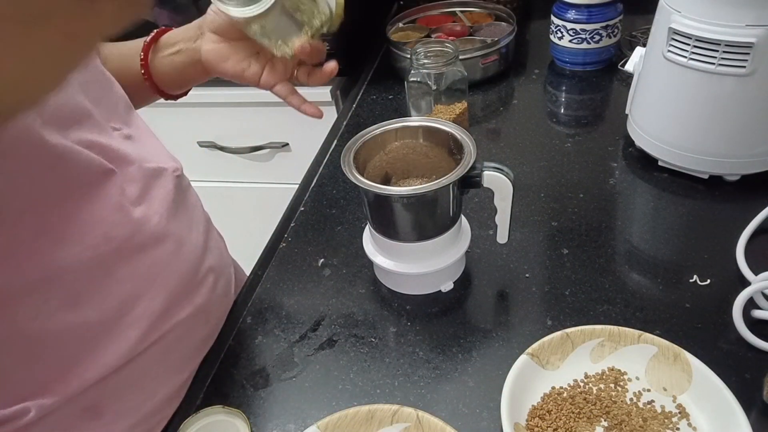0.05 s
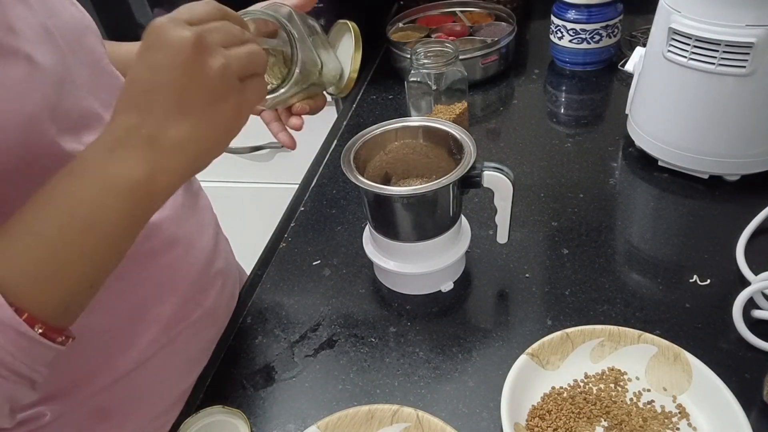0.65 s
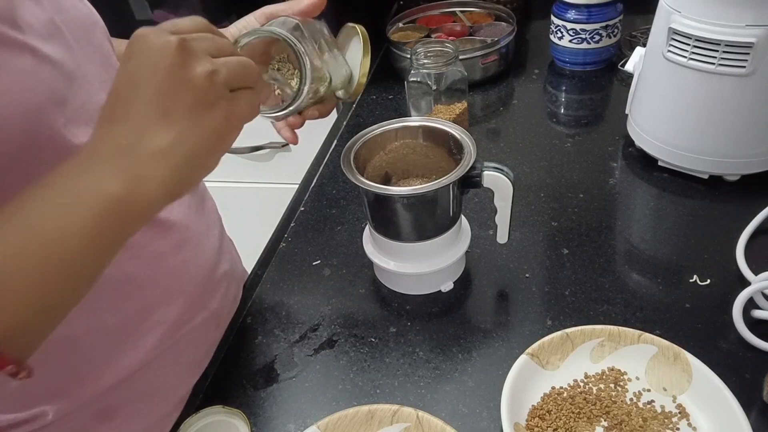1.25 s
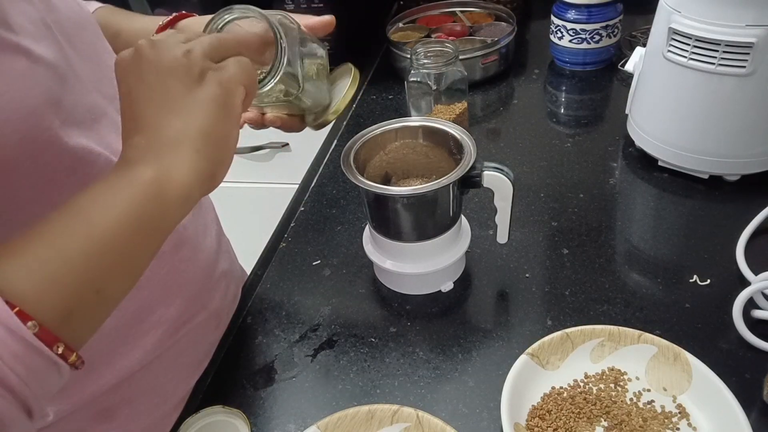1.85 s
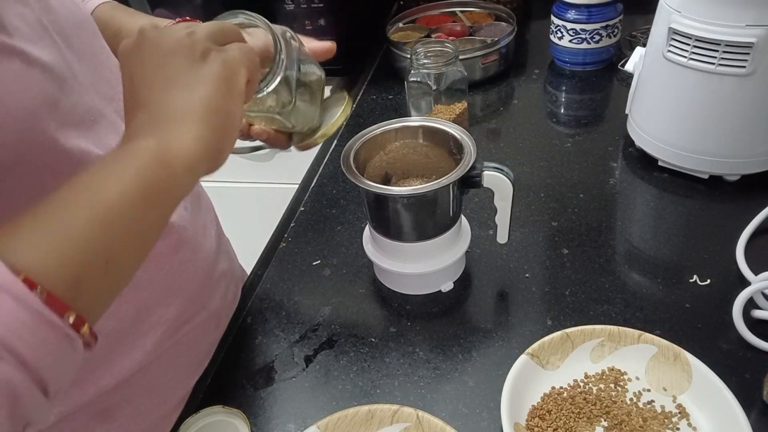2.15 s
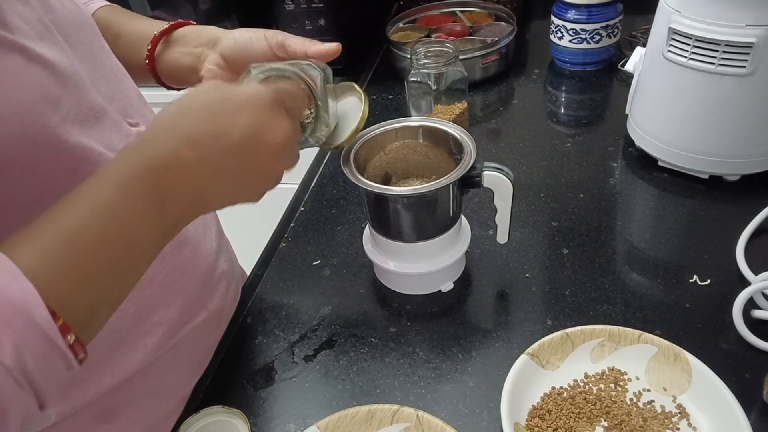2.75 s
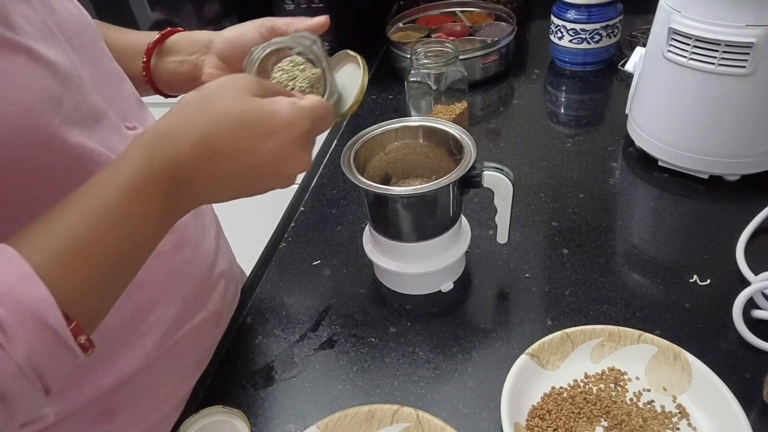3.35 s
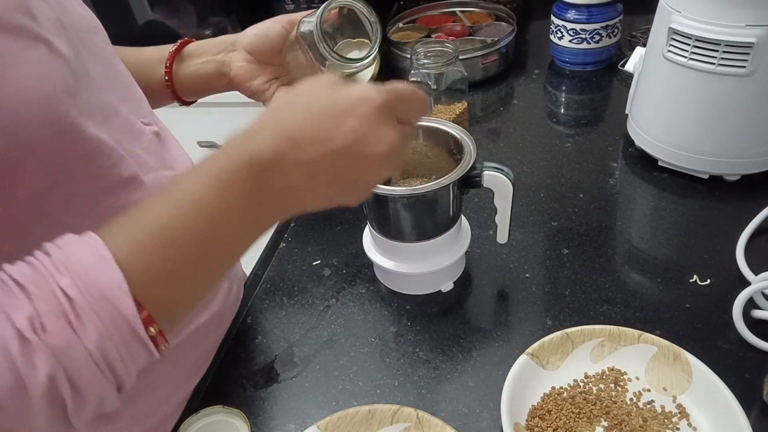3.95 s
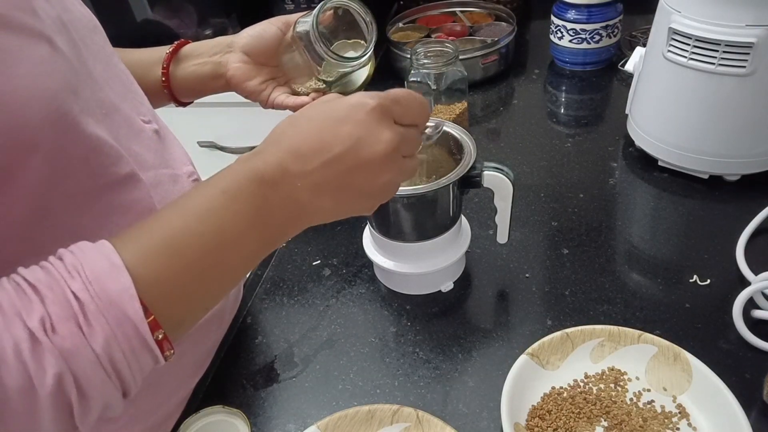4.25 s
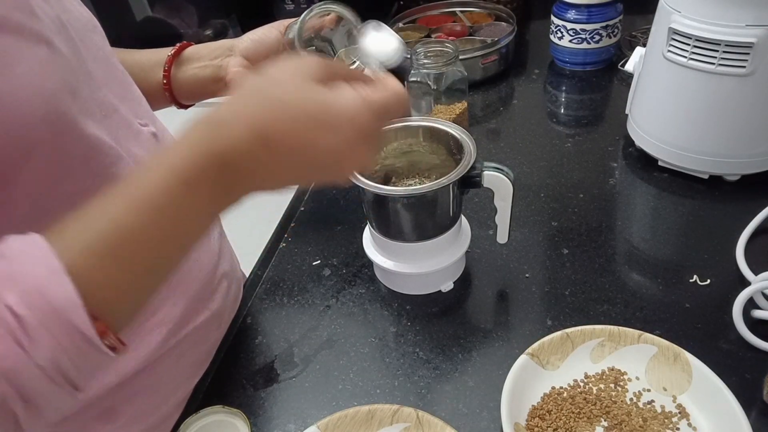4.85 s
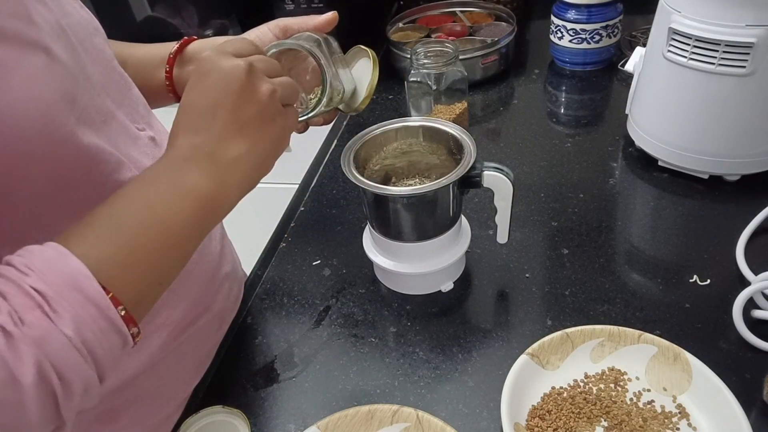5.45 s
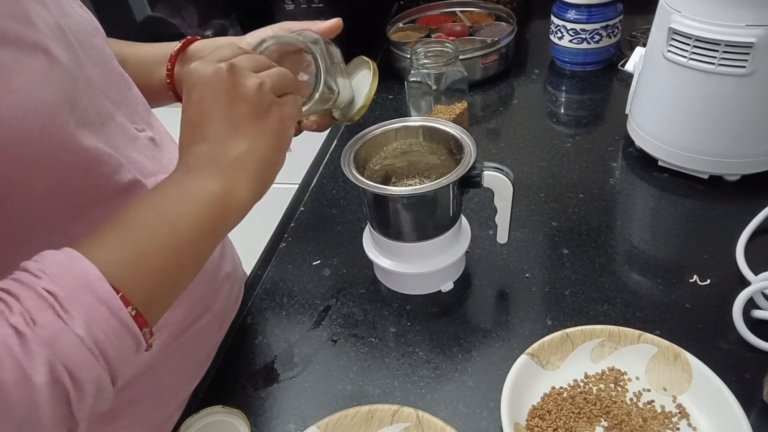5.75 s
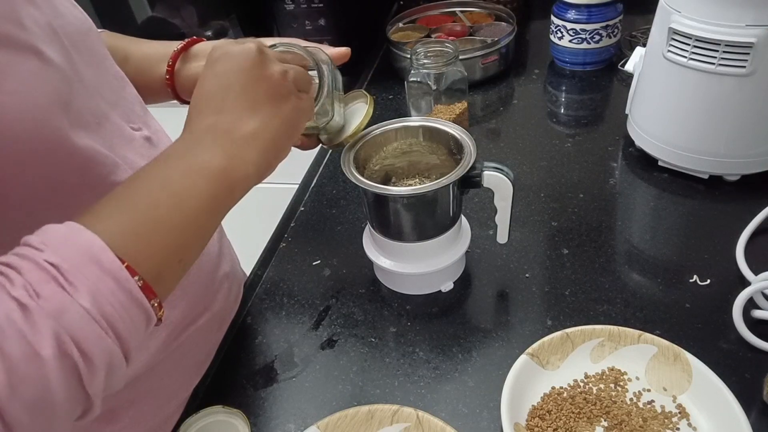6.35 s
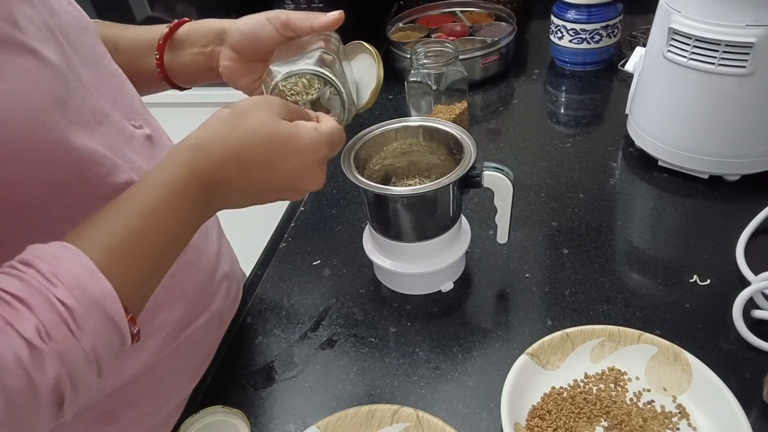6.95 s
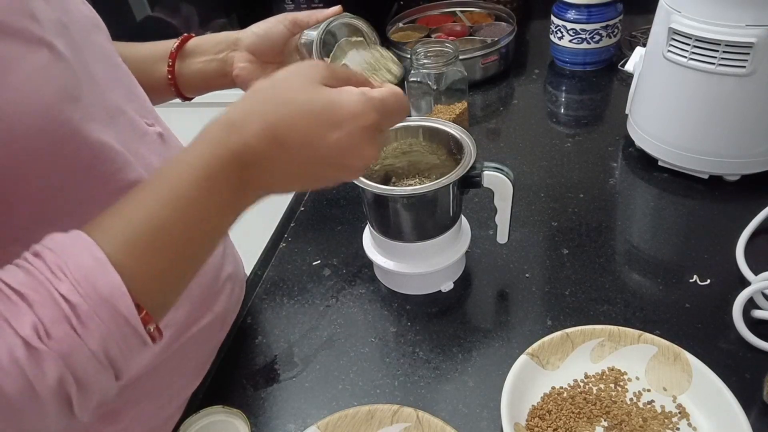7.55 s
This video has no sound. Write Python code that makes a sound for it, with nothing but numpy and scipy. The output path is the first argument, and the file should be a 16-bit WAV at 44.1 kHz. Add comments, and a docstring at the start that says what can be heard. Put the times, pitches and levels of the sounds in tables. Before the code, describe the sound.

In a quiet kitchen with a faint low hum, a nearby metal spoon digs seeds out of a glass jar, making sharp, briefly ringing clinks and gritty little scrapes. The seeds trickle softly into a steel cup with a few light taps. The spoon goes back to the jar, clinking and scraping again, and ends with a couple of small knocks.

```python
"""A steel spoon clinks on a hand-held glass jar and scrapes through the seeds inside, in a tiled kitchen.
Each strike excites the jar's damped resonances; wall, neck and spoon ring on. Scrapes are runs of slips.
Between the two scoops the seeds patter into a steel cup as the spoon taps it.
Small knocks and plinks, some of them thuds of the jar under the spoon, and faint squeaks
sound over a low hum and the rush of air."""
import sys
import numpy as np
from scipy import signal
from scipy.fft import rfft, irfft, next_fast_len
from scipy.io import wavfile
from scipy.ndimage import map_coordinates

SR = 44100
rng = np.random.default_rng(int(sys.argv[2]) if len(sys.argv) > 2 else 0)


def inscribe(sig):
    """Save sig as 16-bit PCM at rate SR to the path in sys.argv[1].

    A 1-D sig is mono; a 2-D sig holds one channel per row.
    Samples are clipped to [-1, 1] before scaling.
    """
    pcm = np.round(np.clip(np.atleast_2d(sig).T, -1, 1) * 32767)
    wavfile.write(sys.argv[1], SR, pcm.astype(np.int16))


N = 339296
SIZE = 32768  # samples per event
HZ = np.fft.rfftfreq(SIZE, 1 / SR)
T = np.arange(SIZE) / SR

# Spoon strikes on the jar. Each row: start in seconds, level in dB, brightness in dB, neck ring in dB,
# mode favoured by the contact point in Hz, its ping in dB.
STRIKES = [ (0.2668, -15, -9.5, 5, 4150, 0.5), (0.3712, -15, -5.5, -17, 6455, 3),
           (0.5306, -25, 4.5, -17, 4790, 6), (0.5597, -32, -5.5, -25.5, 4933, 2),
           (0.627, -33.5, 1.5, -19.5, 1852, -0.5), (1.078, -17.5, 4, -18, 5770, 1.5),
           (1.121, -14.5, -3.5, -10, 2658, -1.5), (1.2439, -25.5, 3, -5, 3817, -9),
           (1.55, -26.5, -5, -5, 4190, -1), (1.7935, -39, 5, -26, 6660, 8),
           (1.9951, -52, 12, -10, 10980, -3.5), (2.269, -31.5, -1.5, -11, 3830, -2),
           (2.548, -15.5, -1, -18.5, 4160, 6), (2.739, -29.5, 2.5, -11.5, 2657, 5),
           (3.2416, -66, 14.5, -16, 6940, 4), (5.396, -33.5, 3.5, -17, 6156, 11.5),
           (5.655, -56.5, 6.5, -27, 6170, 4.5), (5.731, -44.5, 11, -21, 6360, 9),
           (5.808, -48, 10, -24, 6060, 3), (5.8601, -23, -0.5, -15.5, 4870, 2.5),
           (5.893, -25.5, -3.5, -21, 4880, -9), (6.055, -32.5, 4.5, -18, 6140, -8),
           (6.148, -35, 5.5, -21, 1878, 1), (6.242, -40.5, 6, -10.5, 6500, -10),
           (6.368, -20.5, -2.5, -12.5, 2750, 1), (6.626, -44.5, -11.5, -20.5, 5000, 0),
           (6.765, -39.5, -7.5, -13, 2810, -3.5)]
# Tilt of a bright contact. Each row: frequency in Hz, dB per dB of brightness.
BRIGHT_TILT = [(600, -0.03), (2600, -0.25), (4200, -0.06), (6400, 0.52), (8500, 1.09)]
# Free modes of neck, wall and spoon. Each row: frequency in Hz, level in dB, t60 in seconds.
NECK_MODES = [(3440, -1, .28), (3819, 1, .23), (4150, -7, .16), (4205, -5, .18), (6966, -18, .3),
              (8258, -27, .25), (9116, -30, .2), (10612, -35, .2)]
WALL_MODES = [(2507, -26, 0.57), (2820, -21, .4), (2672, -18, 0.2), (2960, -23.5, 0.39)]
SPOON_MODES = [(3895, -8, .45), (4172, -2, .38), (5907, -2, .38), (6119, 0, .4), (6404, -9, .35),
               (6966, -8, .55), (7825, -12, .28), (9450, -19, .35), (10944, -11, .27), (11820, -13, .25),
               (14204, -10, .2), (14917, -4, .17)]


def clinks(snap_t60_s=0.022, chatter_tau_s=0.018, chatter_db=-10, blow_db=29, spoon_db=-26):
    """A snap and brief chatter drive the jar; one mode pings, and neck, spoon and wall ring on."""
    out = np.zeros((2, N))
    rise = 1 - np.exp(-T / 0.0008)
    for start_s, db, bright_db, neck_db, ping_hz, ping_db in STRIKES:
        colour = amp(bright_db * along(BRIGHT_TILT))
        snap = fade(snap_t60_s * 10 ** (-bright_db / 40))  # bright contacts are brief
        chatter = amp(chatter_db + 2.3 * wobble(300, SIZE)) * np.exp(-T / chatter_tau_s)
        contact = unit_energy(force(rise * (snap + chatter), spread=0.44))
        gain = np.hypot(jar_response() * colour, hollow_knock(start_s, db, base_db=-28))
        blow = amp(blow_db) * through(contact, gain)
        ping = ring([(ping_hz, ping_db, 0.12)], scatter_db=1, rattle_rad=0.26)
        neck = amp(neck_db + 1) * ring(NECK_MODES, scatter_db=3)
        spoon = amp(spoon_db - 0.4 * neck_db) * ring(SPOON_MODES, scatter_db=2.5)  # loses to the neck
        wall = amp(2) * ring(WALL_MODES, scatter_db=2.5)
        ringing = through(rise * (ping + neck + spoon + wall), colour)
        add(out, start_s, amp(db) * jar_radiation(blow + ringing))
    return out


# Spoon strokes through the seeds. Each row: start in seconds, length in seconds, level in dB.
STROKES = [ (0.548, 0.14, -42), (1.13, .05, -27.5), (1.486, 0.13, -54), (1.555, 0.027, -32.5),
           (1.7, 0.097, -59.5), (1.92, 0.0683, -60), (2.219, 0.099, -48), (2.429, 0.096, -46),
           (2.509, 0.038, -38), (2.557, .085, -24), (2.645, .039, -25), (2.849, 0.307, -64),
           (5.229, .16, -56.5), (5.411, 0.11, -52), (5.683, 0.28, -53), (5.916, .19, -49.5),
           (6.115, .05, -33), (6.18, .19, -61), (6.373, .072, -25.5), (6.548, 0.38, -62.5),
           (6.901, .48, -70.5), (7.532, .16, -69)]


def scrapes(grit_db=5, clump_db=2, swell_share=0.16, release_s=0.013, spoon_db=-10, ring_on_db=-10):
    """The spoon slips over glass and seeds in clumps of tiny jerks that excite jar and spoon."""
    out = np.zeros((2, N))
    damped_spoon = amp(spoon_db) * body([(hz, 40, db) for hz, db, _ in SPOON_MODES])
    for start_s, length_s, db in STROKES:
        colour = amp(along([(7000, 0.003), (12000, 7.5 + 0.095 * db)]))  # harder is brighter
        swell = np.clip(T / (swell_share * length_s), 0, 1)
        pressure = swell * np.clip((length_s - T) / release_s + 0.5, 0, 1)
        slips = np.minimum(wobble(500, SIZE), 1.3)  # friction caps a slip
        jerks = amp(grit_db * slips + clump_db * wobble(33, SIZE))
        rub = np.linalg.norm(pressure) * unit_energy(force(pressure * jerks, spread=0.25))
        hollow = hollow_knock(start_s + length_s / 2, db, base_db=-30)
        gain = np.hypot(colour * np.hypot(jar_response(), damped_spoon), hollow)
        free_spoon = unit_energy(ring(SPOON_MODES, scatter_db=2.5))
        ring_on = amp(ring_on_db) * signal.fftconvolve(rub, free_spoon, axes=1)[:, :SIZE]
        add(out, start_s, amp(db) * jar_radiation(through(rub, gain) + ring_on))
    return out


# Jar resonances, damped by hand and seeds. Each row: frequency in Hz, width in Hz, level in dB.
JAR_PEAKS = [(1977, 520, -18.5), (2374, 90, -11), (2673, 260, -1), (3310, 110, -15), (3867, 160, 0.5),
             (4156, 340, -3.5), (4957, 172, -4), (5876, 190, -3), (6120, 370, -4.5), (6370, 340, -3.5),
             (6960, 410, -2), (8220, 300, -11.5), (9180, 760, -13.5), (10915, 740, -18.5),
             (11940, 300, -13), (14915, 268, -16)]
# Dense weak modes between them. Each row: frequency in Hz, level in dB.
JAR_FLOOR = [(60, -72.5), (150, -44.5), (400, -37), (1200, -29), (2400, -23), (4000, -8), (6800, -17.5),
             (7700, -38), (11000, -20), (15800, -29)]


def jar_response(scatter_db=1):
    """Each contact point reaches the jar's modes a little differently."""
    peaks = [(hz, width_hz, db + scatter_db * rng.standard_normal()) for hz, width_hz, db in JAR_PEAKS]
    return body(peaks, floor=amp(along(JAR_FLOOR) - 1))


# Resonances of the jar's air and base. Each row: frequency in Hz, width in Hz, level in dB.
HOLLOW_PEAKS = [(511.3, 45, -4), (528, 49, -0.5), (1874, 83, -6.5), (2235, 130, -13.5)]
# Spoon position in the jar. Each row: time in seconds, depth from 0 to 1.
SPOON_DEPTH = [(.3, 0), (.6, .45), (1.1, .65), (1.6, 0.2), (2.3, 0.89), (2.55, 0.62), (2.8, 0), (5.3, 0.19),
               (5.75, 0.89), (6.4, 0.99), (6.9, 0.48)]


def hollow_knock(time_s, contact_db, base_db, depth_range_db=31):
    """Response of the jar's air and base; its share grows with a deep spoon and a soft touch."""
    depth = np.interp(time_s, *np.transpose(SPOON_DEPTH))
    return amp(base_db + depth_range_db * (depth - 1) - 0.58 * contact_db) * body(HOLLOW_PEAKS)


# Directivity of the jar. Each row: frequency in Hz, left minus right in dB.
JAR_BALANCE = [(60, 5), (120, 3.0), (240, 2), (480, 2.5), (950, -1), (1890, 2), (3770, -3), (7520, -0.5),
               (15000, 6.5)]


def jar_radiation(x, twist_rad=0.94, length_s=0.7):
    """Paths round the hands shift level and phase between left and right, phase most in the treble."""
    phase = twist_rad * np.minimum(HZ / 5000, 1) * wobble(60, SIZE // 2 + 1)
    sides = np.array([[1], [-1]])
    paths = amp(sides * along(JAR_BALANCE) / 2) * np.exp(1j * sides * phase)
    return irfft(rfft(x) * paths, SIZE) * (T < length_s)


# Spoon taps on the cup. Each row: start in seconds, level in dB.
CUP_TAPS = [(4.008, -60.5), (4.053, -50.5), (4.22, -57), (4.401, -56)]
# Cup resonances. Each row: frequency in Hz, width in Hz, level in dB.
CUP_PEAKS = [(3170, 204, -16), (6230, 85, -6.5), (7050, 390, -2), (9200, 620, -11.5), (12090, 1200, -3.5),
             (13140, 1500, -12), (14960, 900, -8)]
# Cup ring after a tap. Each row: frequency in Hz, level in dB, t60 in seconds.
CUP_MODES = [(3260, -15.5, 0.46), (6140, 2, 0.15)]


def pouring(start_s=3.98, rise_s=0.17, hold_s=0.22, fall_s=0.15, seeds_per_s=600, clump_db=2):
    """Seeds slide off the spoon and patter into the steel cup while the spoon taps it."""
    out = np.zeros((2, N))
    cup = body(CUP_PEAKS, floor=amp(along([(500, -43), (3000, -20.5), (15000, -19.5)])))
    for tap_s, db in CUP_TAPS:
        tap = amp(24) * through(unit_energy(force(fade(0.05), spread=0.53)), cup)
        add(out, tap_s, amp(db) * (tap + amp(-1.5) * ring(CUP_MODES, scatter_db=3)))
    seeds = unit_rms((rng.random(N) < seeds_per_s / SR) * rng.standard_normal(N))
    corners_s = np.cumsum([start_s, rise_s, hold_s, fall_s])
    flow = np.interp(np.arange(N) / SR, corners_s, [0, 1, 1, 0]) * amp(-66.5 + clump_db * wobble(14))
    treble = amp(along([(3000, -9.5), (7000, -3.5), (12000, 0)]))  # tiny seeds favour high modes
    tick = unit_energy(through(force(fade(0.002), spread=0.55), cup * treble))
    out += signal.fftconvolve((seeds * flow)[None], tick, axes=1)[:, :N]
    return amp([[5.5], [1]]) * delay_left(out, samples=12)


# Small knocks and plinks, each with one pitch; some are thuds of the jar under the spoon.
# Each row: start in seconds, level in dB, pitch in Hz, width in Hz, click in dB, t60 in seconds.
PLINKS = [ (.738, -39, 1515, 162, -39.5, 0.078), (.776, -46, 1235, 414, -33.5, 0.067),
          (1.08, -32, 1840, 260, -26.5, .02), (1.122, -39.5, 900, 820, -23, .087),
          (2.174, -37, 383, 150, -42, 0.15), (2.178, -47.5, 1143, 307, -16, 0.18),
          (4.668, -69.5, 2780, 400, -32, 0.096), (4.738, -67.5, 3760, 500, -27, 0.089),
          (4.872, -53, 1450, 1740, 5, 0.2), (5.397, -46, 1870, 199, -35, 0.0094),
          (7.187, -36.5, 2150, 280, -2, 0.015), (7.565, -53, 1197, 263, -13, .25)]
# Spectrum of their click. Each row: frequency in Hz, level in dB.
CLICK_SPECTRUM = [(200, -17.5), (900, -10), (2200, -0.5), (4000, -6), (6200, -1.5), (8000, -12.5),
                  (15000, -14)]


def plinks(rise_s=0.00084, gain_db=30):
    """Small knocks and plinks: a brief push excites one resonance and a broad click."""
    out = np.zeros((2, N))
    click_gain = unit_rms(amp(along(CLICK_SPECTRUM)))
    for start_s, db, hz, width_hz, click_db, t60_s in PLINKS:
        push = force(fade(t60_s) * (1 - np.exp(-T / rise_s)), spread=0.64)
        tone = unit_energy(through(push, body([(hz, width_hz, 0)])))
        click = amp(click_db) * unit_energy(through(push, click_gain))
        add(out, start_s, amp(db + gain_db) * (tone + click))
    return delay_left(out, samples=15)


# Faint squeaks. Each row: start in seconds, length in seconds, level in dB, pitch in Hz.
SQUEAKS = [(4.992, 0.3, -71.5, 3680), (7.453, 0.15, -71, 3760)]


def squeaks(width_hz=200):
    """Thin bands of noise that swell and fade."""
    out = np.zeros((2, N))
    for start_s, length_s, db, hz in SQUEAKS:
        swell = np.sin(np.pi * np.minimum(T / length_s, 1))
        add(out, start_s, amp(db) * through(force(swell, spread=0.76), body([(hz, width_hz, 0)])))
    return out


# Kitchen reverberation. Each row: frequency in Hz, t60 in seconds.
ROOM_T60 = [(200, 0.29), (1000, 0.23), (2700, 0.45), (6500, 0.34), (10000, 0.29), (15000, 0.21)]


def kitchen(x, early_db=-3, blocks=8):
    """Early echoes off worktop and tiles, then a diffuse tail; paths change as the hands move."""
    out = np.zeros((2, N + SIZE))
    edges = np.linspace(0, N, blocks + 1).astype(int)
    for a, b in zip(edges, edges[1:]):
        hz, t, noise = signal.stft(rng.standard_normal((2, SIZE)), SR, nperseg=256)
        decay = fade(along(ROOM_T60, hz)[:, None], t)
        tail = signal.istft(noise * decay, SR, nperseg=256)[1][:, :SIZE]
        tail = unit_energy(tail * np.clip(T / 0.0036, 0, 1))
        arrivals = (rng.random(SIZE) < 0.015) * (T > 0.002)
        early = unit_energy(rng.standard_normal((2, SIZE)) * arrivals * fade(0.11))
        out[:, a:b + SIZE - 1] += signal.fftconvolve(x[:, a:b], tail + amp(early_db) * early, axes=1)
    return out[:, :N]


# Hum tones. Each row: frequency in Hz, level in dB.
HUM_TONES = [(107.7, -63.5), (140.0, -78), (263.8, -81)]


def hum(waver_db=1.1, waver_rad=0.35):
    """Low tones that waver slightly in level and phase."""
    out, t = np.zeros(N), np.arange(N) / SR
    for hz, db in HUM_TONES:
        peak = np.sqrt(2) * amp(db + waver_db * wobble(7))
        out += peak * np.sin(2 * np.pi * hz * t + waver_rad * wobble(7))
    return out


# Room air spectrum. Each row: frequency in Hz, relative density in dB.
AIR_SPECTRUM = [(20, -20), (60, -19.5), (80, -12), (100, -7.5), (150, -9.5), (230, -18.5), (500, -17),
                (900, -19.5), (1900, -30), (4200, -36), (6500, -38), (8500, -43), (15200, -48.5),
                (16500, -56.5)]
# Likeness of left and right. Each row: frequency in Hz, coherence from 0 to 1.
AIR_COHERENCE = [(30, 0.3), (100, 1), (400, 0.4), (1200, 0), (5000, .15)]


def room_air(level_db=-64):
    """A soft rush, most alike on both sides in the bass."""
    size = next_fast_len(N)
    hz = np.fft.rfftfreq(size, 1 / SR)
    angle = np.arccos(np.clip(along(AIR_COHERENCE, hz), 0, 1)) / 2
    gain = amp(along(AIR_SPECTRUM, hz))
    gain /= np.sqrt(np.mean((gain * (hz > 150)) ** 2))  # unit rms above 150 Hz
    spectrum = rfft(rng.standard_normal((2, size))) * gain
    mid, side = irfft(spectrum * [np.cos(angle), np.sin(angle)], size)[:, :N]
    return amp(level_db) * np.array([mid + side, mid - side])


def force(envelope, spread):
    """Random contact force; spread sets the part that differs between left and right."""
    return envelope * (rng.standard_normal(SIZE) + spread * rng.standard_normal((2, SIZE)))


def ring(modes, scatter_db, rattle_rad=0.24):
    """Decaying stereo modes at random strengths; loose seeds jostle their phase."""
    out = np.zeros((2, SIZE))
    jostle = rattle_rad * wobble(150, 2 * SIZE)
    for hz, db, t60_s in modes:
        phase = rng.uniform(0, 2 * np.pi) + rng.normal(0, 0.67, (2, 1))
        phase = phase + jostle[rng.integers(SIZE):][:SIZE]
        envelope = amp(db + scatter_db * rng.standard_normal()) * fade(t60_s)
        out += envelope * np.sin(2 * np.pi * hz * T + phase)
    return out


def body(peaks, floor=0):
    """Gain of resonances over a floor, with mean power 1."""
    power = sum(amp(db) ** 2 / (1 + ((HZ - hz) / (width_hz / 2)) ** 2) ** 2 for hz, width_hz, db in peaks)
    return unit_rms(np.sqrt(floor ** 2 + power))


def through(x, gain):
    """Minimum-phase filter with this gain."""
    cepstrum = irfft(np.log(np.maximum(gain, 1e-6)))
    cepstrum[1:SIZE // 2] *= 2
    cepstrum[SIZE // 2 + 1:] = 0
    return irfft(rfft(x) * np.exp(rfft(cepstrum)), SIZE)


def amp(db):
    """Decibels to gain."""
    return 10 ** (np.asarray(db) / 20)


def unit_rms(x):
    """Scale to rms 1."""
    return x / np.sqrt(np.mean(x ** 2) + 1e-20)


def unit_energy(x):
    """Scale each channel to energy 1."""
    return x / (np.linalg.norm(x, axis=-1, keepdims=True) + 1e-20)


def along(points, hz=HZ):
    """Interpolate (Hz, value) points on a log axis."""
    knots_hz, values = np.transpose(points)
    return np.interp(np.log(hz + 1), np.log(knots_hz + 1), values)


def fade(t60_s, t=T):
    """Exponential decay."""
    return amp(-60 * t / t60_s)


def wobble(knots_per_s, size=N):
    """Smooth random curve."""
    knots = rng.standard_normal(int(size * knots_per_s / SR) + 4)
    return map_coordinates(knots, [np.arange(size) * knots_per_s / SR])


def delay_left(x, samples):
    """The left channel lags the right."""
    return np.array([np.roll(x[0], samples), x[1]])


def add(track, start_s, x):
    """Mix an event into the track."""
    i = max(round(start_s * SR), 0)
    track[:, i:i + SIZE] += x[:, :max(N - i, 0)]


def scene():
    """Spoon work, small knocks and squeaks, the room and its hum."""
    spoon_work = clinks() + scrapes() + pouring()
    small_sounds = plinks() + squeaks()
    reverb = kitchen(amp(-8) * spoon_work + small_sounds)
    background = (hum() + room_air()) * amp([[1.2], [-1.2]])
    return amp(-2) * spoon_work + amp(-3.5) * small_sounds + reverb + background


def record(dry):
    """Round off the highest peaks and cut the top treble."""
    ceiling, top_hz = 0.9, 15950
    rounded = dry / (1 + np.abs(dry / ceiling) ** 6) ** (1 / 6)
    size = next_fast_len(N + SIZE)
    passband = np.fft.rfftfreq(size, 1 / SR) < top_hz
    return irfft(rfft(rounded, size) * passband, size)[:, :N]


dry = scene()
out = record(dry)
inscribe(out)
```